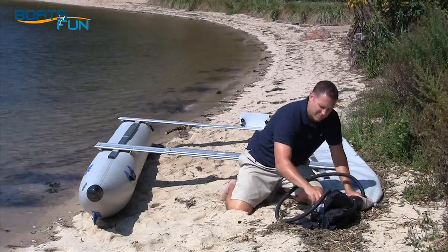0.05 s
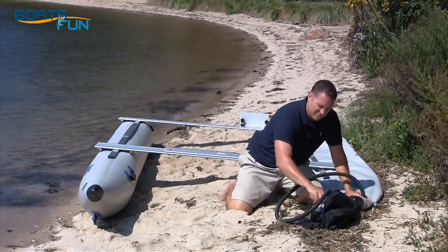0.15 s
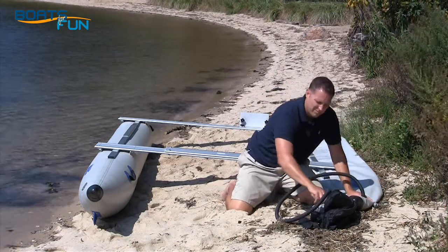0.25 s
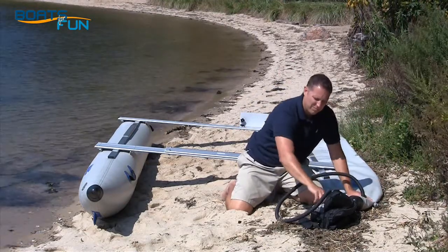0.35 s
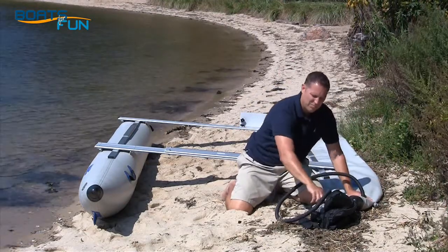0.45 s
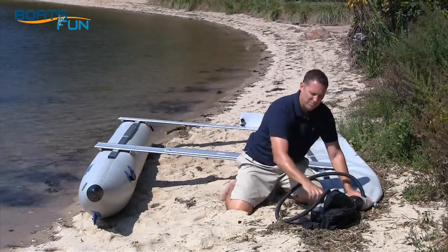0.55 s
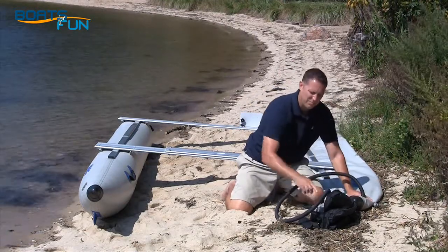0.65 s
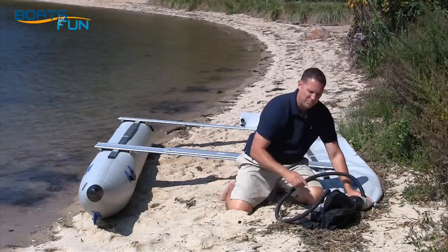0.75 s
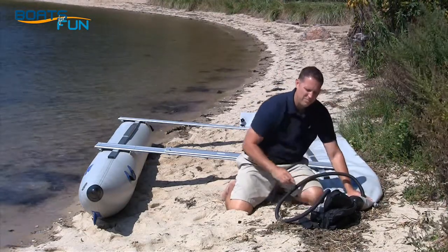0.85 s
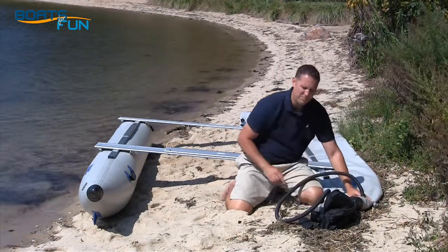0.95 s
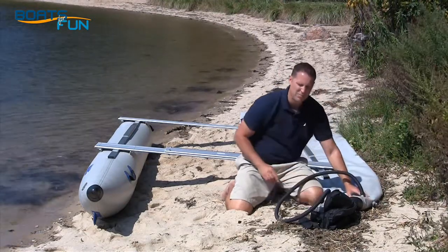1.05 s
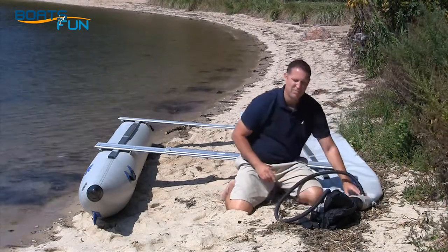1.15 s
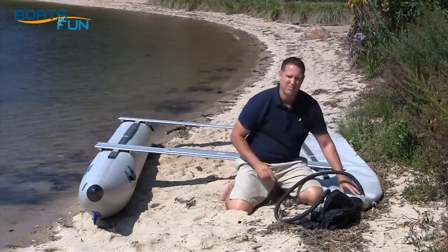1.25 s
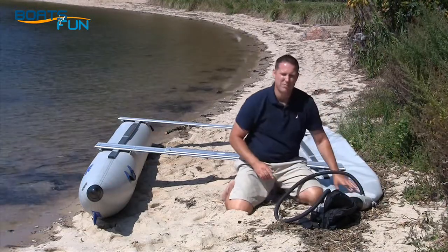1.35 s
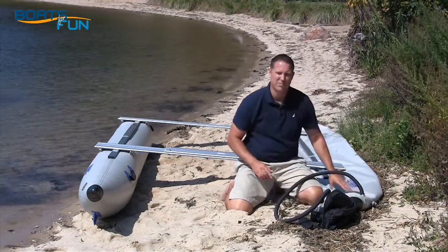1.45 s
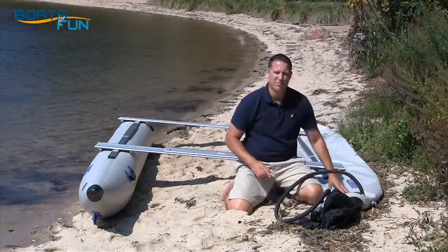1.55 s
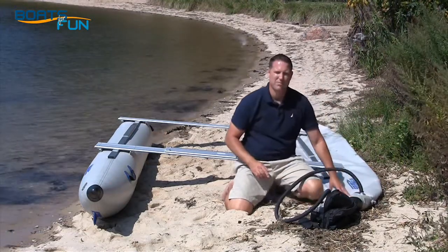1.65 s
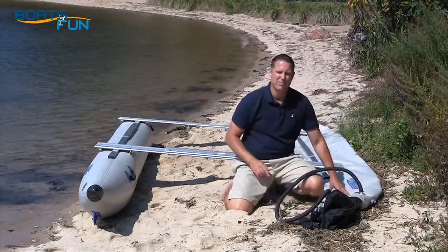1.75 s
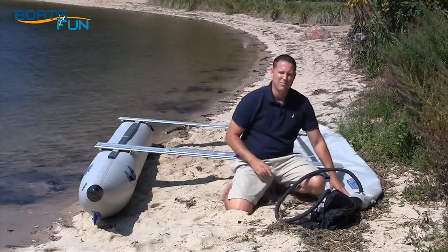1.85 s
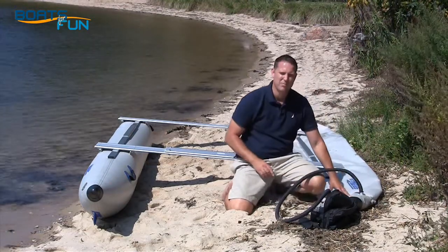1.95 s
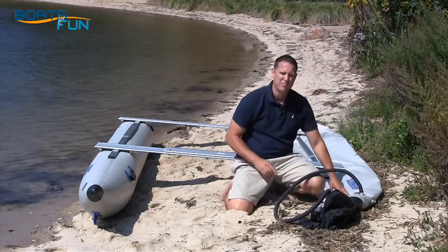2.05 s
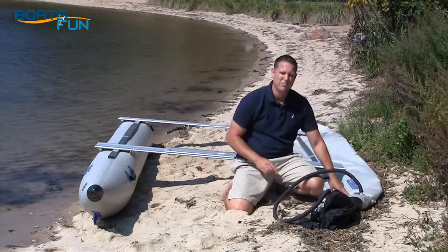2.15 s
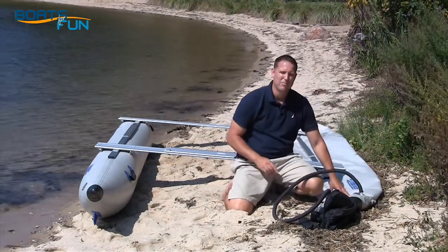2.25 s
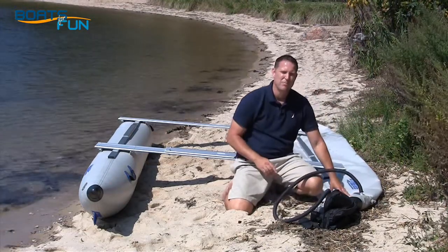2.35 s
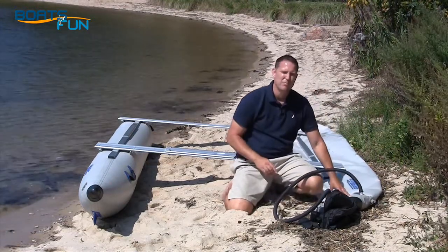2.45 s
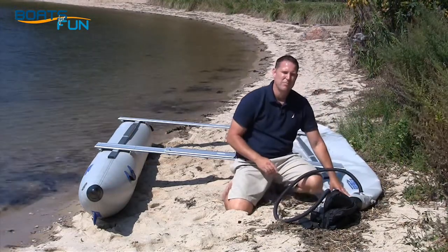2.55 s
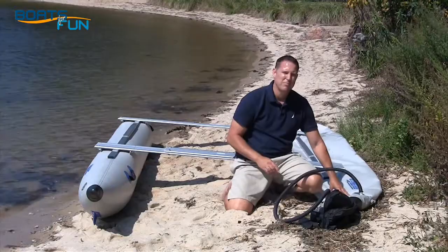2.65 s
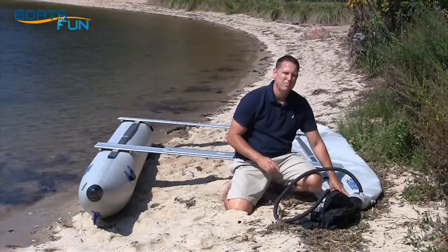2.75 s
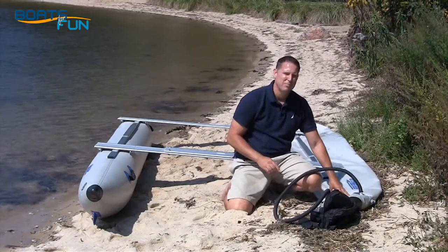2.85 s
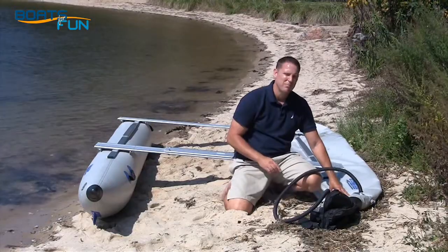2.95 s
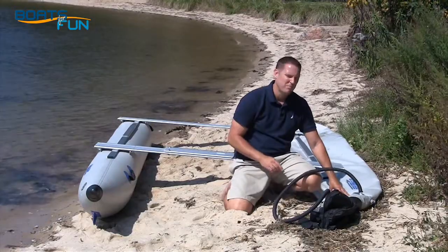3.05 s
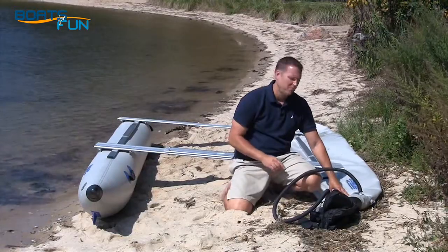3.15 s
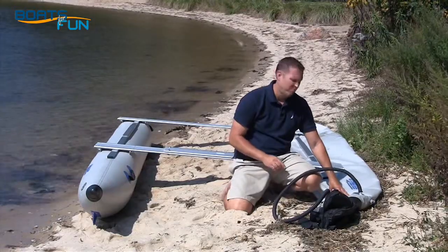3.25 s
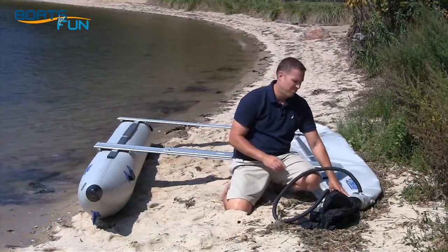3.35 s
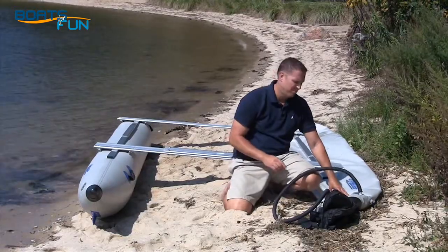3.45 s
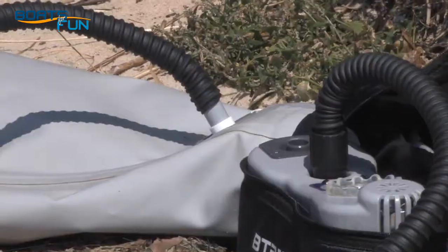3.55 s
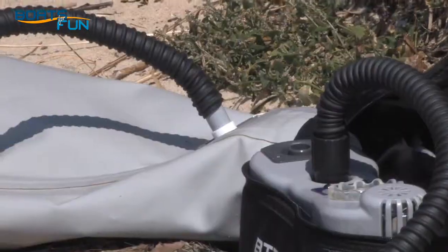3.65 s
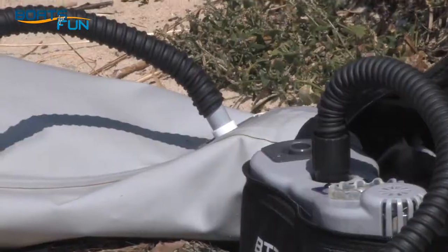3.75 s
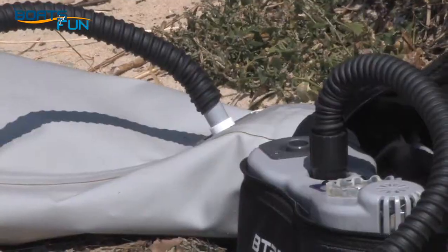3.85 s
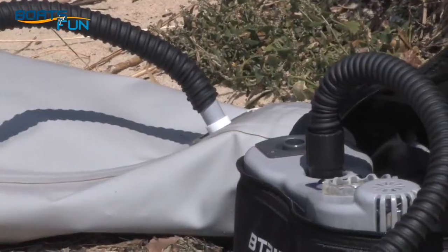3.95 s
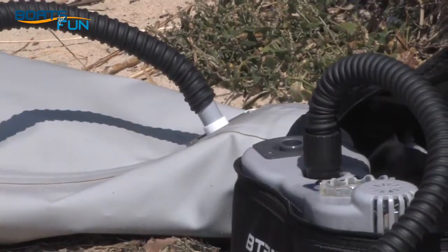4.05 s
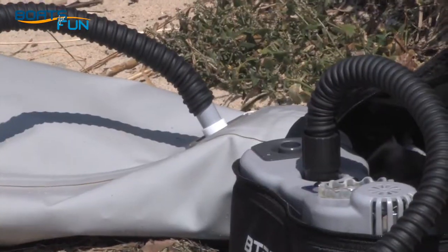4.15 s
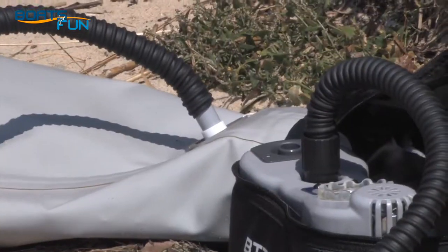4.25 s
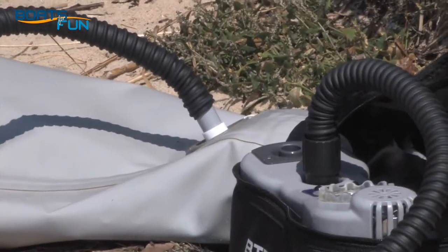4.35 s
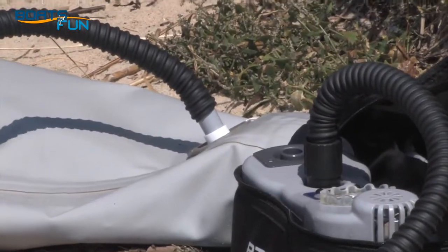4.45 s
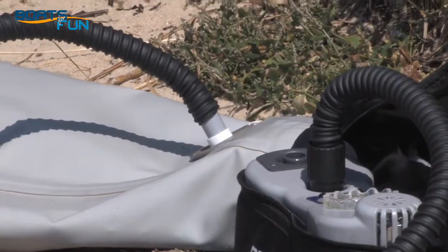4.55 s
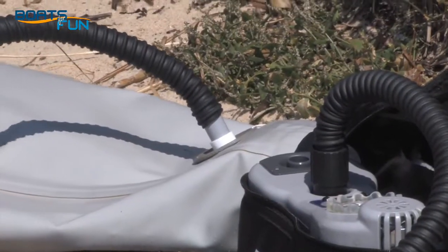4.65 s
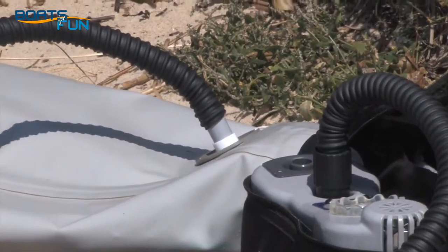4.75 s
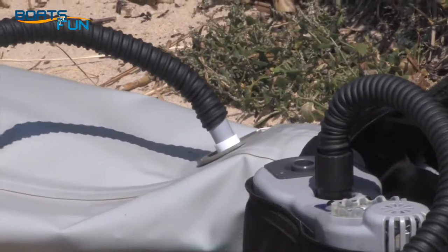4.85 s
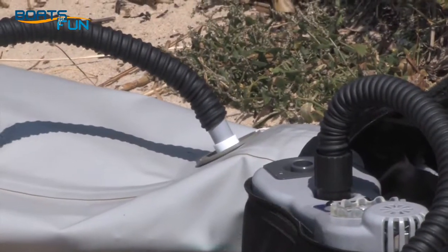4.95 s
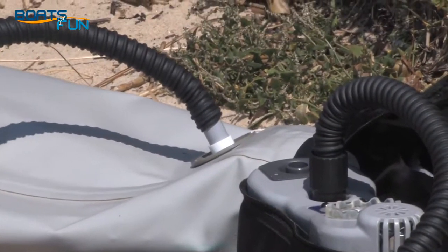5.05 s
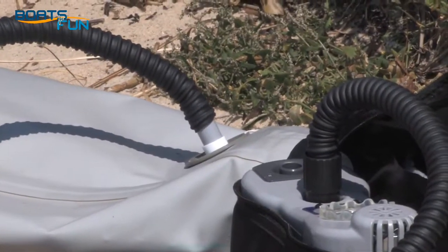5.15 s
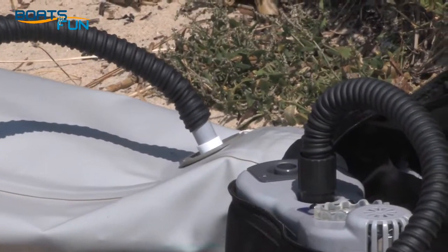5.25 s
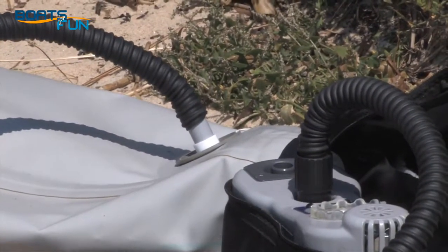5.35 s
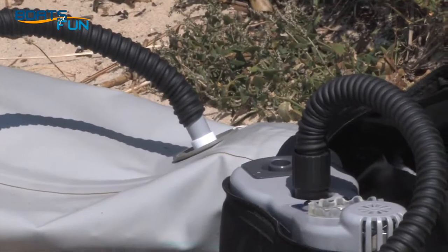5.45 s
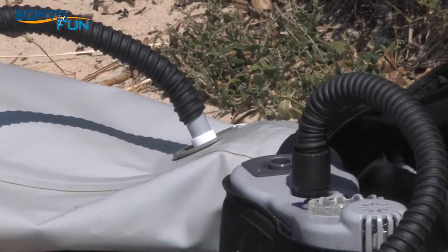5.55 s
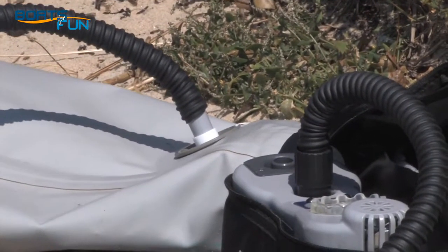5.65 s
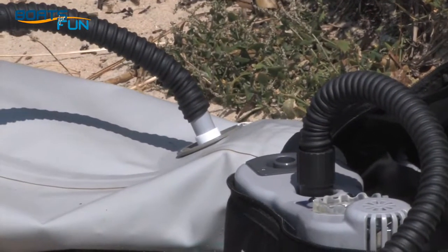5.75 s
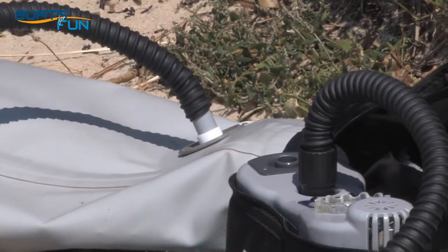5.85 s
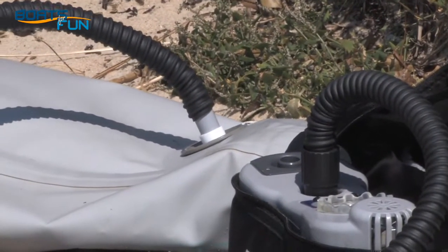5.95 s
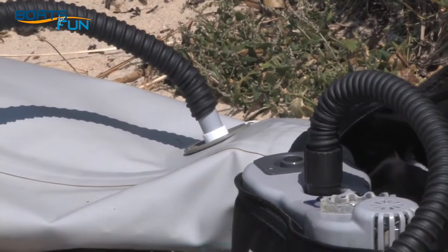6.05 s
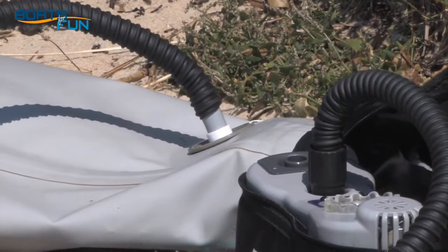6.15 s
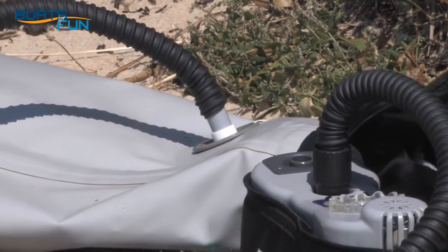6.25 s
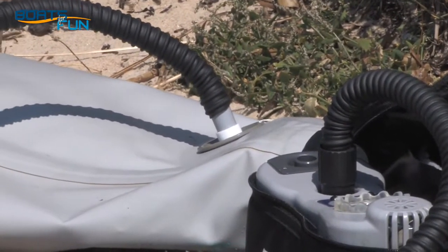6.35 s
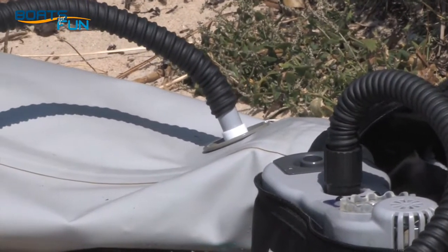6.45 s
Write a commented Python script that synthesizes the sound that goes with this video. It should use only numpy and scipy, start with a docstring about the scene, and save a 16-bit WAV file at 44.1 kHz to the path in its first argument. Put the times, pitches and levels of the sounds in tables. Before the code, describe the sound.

The first 0.4 seconds are quiet: a low, soft wash of shoreline water, faint low hums and a very distant engine, with small dull plastic taps at about 0.15 to 0.19 seconds. At about 0.42 a switch clicks brightly, followed by a tiny rattle, and a small electric blower starts close to the microphone. Its whine sweeps up steeply, with a brief buzzing flare from the casing near 0.6, and is close to full speed by 1.2 to 1.5 as the air noise thickens and brightens. From there it runs steadily to the end at 6.5 seconds: a loud, dominant singing hum around 455 Hz with thinner overtones, wavering very slightly, over hollow hose roar, a hissing jet at the valve and fine high intake hiss. The air swells gently near 2.3, 4.2 and 5.5; the timbre shifts subtly around 3.5. Open air, no echo, no shutdown.

```python
"""A small electric blower, loud in front of the microphone on a beach, spins up and fills a boat tube by hose.
Its unbalanced rotor sings at shaft speed while higher shaft orders sweep through a housing resonance.
Shaped noise makes the air: a roar in the ribbed hose, a jet at the valve and a fine intake hiss.
Clicks of hand, switch and first turns are struck plastic modes with a bright crack.
Behind lie the shore's wash (noise), a far engine (a gliding sine) and two faint hums (narrow noise)."""
import sys
import numpy as np
from scipy import signal
from scipy.fft import rfft, irfft, next_fast_len
from scipy.io import wavfile
from scipy.ndimage import uniform_filter1d

SR = 44100
rng = np.random.default_rng(int(sys.argv[2]) if len(sys.argv) > 2 else 0)


def to_wav(s):
    """Save 16-bit WAV."""
    ch = np.atleast_2d(s).T  # columns
    pcm = np.round(np.clip(ch, -1, 1) * 32767)  # PCM
    wavfile.write(sys.argv[1], SR, pcm.astype(np.int16))


N = 286958  # samples
TIME_S = np.arange(N) / SR
FFT_SIZE, HOP = 1024, 256  # samples
HZ, FRAME_S = np.fft.rfftfreq(FFT_SIZE, 1 / SR), np.arange(N // HOP + 5) * HOP / SR


def amp(db):
    """Decibels to gain."""
    return 10 ** (np.asarray(db) / 20)


def evened(x):
    """Scales to rms 1."""
    return x / np.sqrt(np.mean(x ** 2) + 1e-20)


def curves(rows):
    """Columns of a time table, one value a sample."""
    s, *columns = np.transpose(rows)
    return [np.interp(TIME_S, s, column) for column in columns]


def read(points, hz):
    """Columns of a spectrum table, read on a log frequency axis."""
    f, *columns = np.transpose(points)
    return [np.interp(np.log(hz + 1), np.log(f + 1), column)[:, None] for column in columns]


def bumps(modes, hz):
    """Resonances as added dB over frequency."""
    return sum(db / (1 + (2 * (hz - f) / width) ** 2) for f, width, db in modes)[:, None]


def resonate(x, hz, width):
    """Shifts hz down to zero, smooths and shifts back: a resonance of gain 1."""
    turn = np.exp(2j * np.pi * hz * np.arange(len(x)) / SR)
    r = np.exp(-np.pi * width / SR)
    return 2 * (turn * signal.lfilter([1 - r], [1, -r], x / turn)).real


def drift(rate_hz):
    """Slow random wander of rms 1, weakening above about rate_hz."""
    spectrum = rfft(rng.standard_normal(N))
    rolloff = 1 + (np.fft.rfftfreq(N, 1 / SR) / rate_hz) ** 2
    return evened(irfft(spectrum / rolloff, N))


def noise(shape_db, patchy_db):
    """Random short-time spectra under a shape, with drifting patches; rms 1."""
    real, imag, patches = rng.standard_normal((len(FRAME_S), len(HZ), 3)).T
    patches = uniform_filter1d(patches, size=10, axis=0)  # over frequency
    patches = evened(uniform_filter1d(patches, size=16, axis=1))  # over time
    spectra = (real + 1j * imag) * amp(shape_db + patchy_db * patches)
    return evened(signal.istft(spectra, nperseg=FFT_SIZE, noverlap=FFT_SIZE - HOP)[1][:N])


def step(s, spread_s):
    """Rises smoothly from 0 to 1 around the moment s."""
    return .5 + .5 * np.tanh((TIME_S - s) / (2 * spread_s))


def bell(s, spread_s):
    """A smooth hump of height 1 around the moment s."""
    return np.exp(-.5 * ((TIME_S - s) / spread_s) ** 2)


def switched_on(s):
    """Silence until the moment s, then a 10 ms rise."""
    return np.clip((TIME_S - s) / 0.01, 0, 1)


# Wash of the shore behind the blower. Each row: frequency in Hz, relative level in dB per Hz.
SHORE_SPECTRUM = [(25, -17), (45, 0.5), (100, 3), (150, -2), (250, -4), (350, -14), (800, -14), (1200, -22),
                  (2200, -33), (3000, -36.5), (8000, -40), (11500, -45.5), (12500, -68), (13500, -81)]
SHORE_DB = -44.5  # rms


def shore_wash():
    """Low wash of the shore: noise falling off towards the treble."""
    return amp(SHORE_DB) * noise(read(SHORE_SPECTRUM, HZ)[0], patchy_db=1.0)


# Engine far off. Each row: time in seconds, firing rate in Hz, level in dB.
FAR_ENGINE = [(0, 47.3, -45), (1.1, 50.1, -45), (2.2, 49, -42), (2.6, 52.64, -52), (3.2, 59, -49),
              (4, 62.6, -46), (4.8, 69.4, -47), (5.4, 71.53, -41), (6, 72.77, -45.5), (6.51, 74.7, -46)]


def far_engine():
    """One sine at the firing rate of an engine that speeds up, wavering in pitch and level."""
    firing_hz, level_db = curves(FAR_ENGINE)
    angle = 2 * np.pi * np.cumsum(firing_hz + 0.81 * drift(3.14)) / SR
    return np.sqrt(2) * amp(level_db + 2.1 * drift(2.8)) * np.cos(angle)


# Wavering low hums in the background. Each row: frequency in Hz, width of each filter pass in Hz, level in dB.
LOW_HUMS = [(73.4, 10, -49.5), (117.3, 3.7, -55)]


def low_hums():
    """Noise passed twice through a narrow resonance, so each hum wavers."""
    out = np.zeros(N)
    for hz, width, db in LOW_HUMS:
        narrow = resonate(rng.standard_normal(N), hz, width)
        out += amp(db) * evened(resonate(narrow, hz, width))
    return out


# Hand on the case, the switch and the rattle of the first turns.
# Each row: start in seconds, level in dB, pitch struck near in Hz, bright crack in dB relative to the ring.
TOUCHES = [(0.14, -33, 1950, -38), (.177, -37, 1900, -30), (.183, -30, 600, -25), (.187, -37, 1600, -21),
           (.420, -34.5, 2200, 2.5), (0.427, -27.5, 750, -16), (0.436, -40, 600, -11),
           (0.444, -34, 845, -25), (.451, -25, 620, -30), (.456, -31, 596, -30), (.460, -32, 950, -27),
           (.469, -29, 910, -26.5)]
# Modes of the plastic. Each row: frequency in Hz, width in Hz.
PLASTIC_MODES = [(580, 100), (780, 77), (950, 200), (1650, 240), (2150, 270)]
REACH_DB_PER_OCT = -20  # modes far from the struck pitch ring less


def clicks():
    """Each touch rings the plastic's damped modes briefly and starts with a bright crack."""
    out, t = np.zeros(N), np.arange(1200) / SR
    for s, db, struck_hz, crack_db in TOUCHES:
        ring = np.zeros(len(t))
        for hz, width in PLASTIC_MODES:
            reach = amp(REACH_DB_PER_OCT * abs(np.log2(hz / struck_hz)))
            ring += reach * np.sin(2 * np.pi * hz * t) * np.exp(-np.pi * width * t)
        ring *= 1 - np.exp(-t / 0.00038)  # soft onset
        grit = evened(resonate(rng.standard_normal(len(t)), 6000, 5000))
        crack = grit * (t / 0.0018) ** 2 * np.exp(2 - 2 * t / .002) / 2
        at = round(s * SR)
        out[at:at + len(t)] += amp(db) * (ring + amp(crack_db) * crack)
    return out


ON_S = .43  # the motor starts
# The speed the shaft heads for; early rows shape the spin-up glide, later ones waver slowly with the load.
# Each row: time in seconds, shaft speed in Hz.
SPEED_GOAL = [(.43, 448.6), (.46, 461.4), (.5, 451.9), (.535, 452.5), (.57, 459), (.61, 461), (.67, 457),
              (.85, 455.3), (1.2, 454.2), (1.42, 460), (1.72, 455), (2.0, 456.3), (2.3, 457), (2.73, 452.8),
              (3.1, 456.4), (3.38, 456.3), (3.77, 455.7), (4.05, 459.3), (4.45, 457), (4.72, 454.5),
              (5.15, 457.6), (5.4, 456.4), (5.74, 452), (6.1, 456), (6.5, 453)]
# Lag behind that speed, as two dying terms. Each row: lag at the start in Hz, time constant in seconds.
SPIN_UP_LAG = [(333.1, .1581), (67.8, .631)]


def speed():
    """Shaft speed in Hz: the goal less a lag that dies away exponentially."""
    running_s = np.maximum(TIME_S - ON_S, 0)
    lag = sum(hz * np.exp(-running_s / s) for hz, s in SPIN_UP_LAG)
    return curves(SPEED_GOAL)[0] - lag


def speed_octaves(hz):
    """Octaves of speed relative to the last goal."""
    return np.log2(hz / SPEED_GOAL[-1][1])


PRESSURE_S, PRESSURE_SPREAD_S = 1.244, 0.14  # pressure builds
FIRM_S, FIRM_SPREAD_S = 4.65, .08  # the tube firms
# The colour changes over two spans: reaching full speed, and a later slide (from s, to s).
FULL_S, SLIDE_S = (1.1, 1.6), (3.4, 3.7)
# Air layers. Each row: full level in dB, growth in dB per octave of speed, gain in dB as pressure builds,
# change in dB once the tube firms, rms gust in dB (the sign is immaterial).
LOW_ROAR, UPPER_ROAR = (-28, 9, 0.5, 0.26, 1), (-27, 4.5, 6.5, 0.3, 0.35)
JET_LEVEL, INTAKE_LEVEL = (-38.5, 8.5, 15, -3, 0), (-45, 7.5, 0, -1, -1.03)
# Swells of the upper roar and the jet. Each row: centre in seconds, spread in seconds, lift in dB.
AIR_SURGES = [(2.3, .2, 1), (4.2, .22, 1.5), (5.45, 0.074, 1)]


def air_level(layer):
    """Level of one layer in dB: turbulence grows with speed and shifts with pressure."""
    full_db, growth_db, build_db, firm_db, gust_db = layer
    level_db = full_db + growth_db * speed_octaves(speed())
    level_db += build_db * (step(PRESSURE_S, PRESSURE_SPREAD_S) - 1)
    return level_db + firm_db * step(FIRM_S, FIRM_SPREAD_S) + gust_db * drift(2.1)


def surge_lift():
    """Brief swells in dB."""
    return sum(db * bell(s, spread) for s, spread, db in AIR_SURGES)


# Fine hiss at the intake. Each row: frequency in Hz, then relative level in dB per Hz while spinning up,
# at full speed, and after the slide.
INTAKE_SPECTRUM = [(3480, -4.5, -3, -19.5), (5030, 5, 1.5, -0.5), (5960, 6, 4.5, 1.5), (6350, 5, -1, 4.5),
                   (7130, 5.5, 8.5, 9.5), (7650, 4.5, 6, 3.5), (8100, 3.5, 6, 5.5), (9257, -1.5, 1.5, 3.5),
                   (10300, 0.5, 0, -4.5), (11870, -0.5, 5.5, 1.5), (12100, -11, 9, 6),
                   (12260, -43, -8.5, 5), (13000, -58, -52, -48)]


def intake_hiss():
    """Turbulence at the intake: noise whose spectrum passes through three states."""
    rising, before, after = read(INTAKE_SPECTRUM, HZ)
    full, slide = (np.interp(FRAME_S, span, [0, 1]) for span in (FULL_S, SLIDE_S))
    shape_db = rising + full * (before - rising) + slide * (after - before)
    return amp(air_level(INTAKE_LEVEL)) * noise(shape_db, patchy_db=2.04)


# Jet at the valve. Each row: frequency in Hz, relative level in dB.
JET_SPECTRUM = [(2000, -16), (2900, -4.5), (3300, -6.5), (3680, -4.5), (4000, -6), (4600, -9.5),
                (5400, -13.5), (6500, -47)]
# Resonances of the valve. Each row: frequency in Hz, width in Hz, lift in dB.
JET_MODES = [(3320, 220, 5), (3593, 90, 8), (3820, 46, 3), (4800, 240, 2)]


def valve_jet():
    """Air forced through the valve: noise lifted at the valve's resonances."""
    shape_db = read(JET_SPECTRUM, HZ)[0] + bumps(JET_MODES, HZ)
    return amp(air_level(JET_LEVEL) + surge_lift()) * noise(shape_db, patchy_db=1.2)


# Roar in the hose. Each row: frequency in Hz, relative level in dB.
ROAR_SPECTRUM = [(150, -15.5), (300, -9), (450, -3.5), (900, -1.5), (1300, -5), (2300, -4), (2700, -10.5),
                 (3200, -22), (4500, -43)]
# Standing waves of the ribbed hose. Each row: frequency in Hz, width in Hz, lift in dB.
HOSE_MODES = [(478, 110, 6.5), (650, 59, 7.5), (802, 55, 10.5), (1142, 62, 8), (1508, 170, 6),
              (2038, 160, 5.5), (2570, 190, 2.5), (2980, 230, 2.5)]


def hose_roar():
    """Turbulence in the hose's standing waves; the upper part comes up later than the lower."""
    low_db, upper_db = air_level(LOW_ROAR), air_level(UPPER_ROAR) + surge_lift()
    upper = np.clip(np.log2(HZ / 900 + 1e-9), 0, 1)[:, None]  # fades in from 900 to 1800 Hz
    tilt_db = upper * np.interp(FRAME_S, TIME_S, upper_db - low_db)
    shape_db = read(ROAR_SPECTRUM, HZ)[0] + bumps(HOSE_MODES, HZ) + tilt_db
    return amp(low_db) * noise(shape_db, patchy_db=0.8)


def air():
    """All moving air, heard once the motor starts."""
    return (hose_roar() + valve_jet() + intake_hiss()) * switched_on(ON_S)


# Levels that waver while running, ahead of the radiation, speed and case terms.
# Each row: time in seconds, shaft tone in dB, 2nd order in dB, blade whine in dB.
RUNNING_WAVER = [(.56, -10, -53, -72), (.61, -12, -54, -53), (.66, -10.5, -52, -68),
                 (.75, -11.5, -41.5, -53), (.9, -10.5, -48, -56), (1.0, -11, -28, -56),
                 (1.15, -11.5, -34.5, -52), (1.35, -11.5, -34.5, -66), (1.58, -12.5, -36, -56),
                 (1.95, -12, -41, -50), (2.25, -12, -38.5, -53), (2.47, -12.5, -33.5, -54),
                 (2.8, -13.5, -36, -63), (3.05, -10.7, -45.5, -56), (3.45, -11, -41, -47.5),
                 (3.78, -11.3, -41.5, -58), (4.05, -12, -35, -58), (4.28, -11.6, -42, -56),
                 (4.45, -10.5, -34.5, -53), (4.7, -11, -46, -56), (5.0, -10.5, -41.5, -52.5),
                 (5.4, -11, -42, -48), (5.75, -11.5, -43, -55), (6.1, -11, -40, -51),
                 (6.5, -11.5, -35.5, -50)]
SECOND_WAVER_DB, TONE_FLUTTER_DB = 2.5, 0.51  # rms
SPEED_JITTER_HZ = .12  # rms
# The small case radiates the shaft tone poorly at low speed. Each row: frequency in Hz, gain in dB.
TONE_RADIATION = [(160, -44), (195, -30), (270, -34), (295, -25), (335, -15), (385, -6.5), (405, -4),
                  (420, -2.5), (428, 0)]


def shaft_tone(hz, angle, tone_db):
    """The unbalanced rotor shakes the case once a turn: a sine at shaft speed."""
    radiation_db = read(TONE_RADIATION, hz)[0][:, 0]
    return amp(tone_db + radiation_db + TONE_FLUTTER_DB * drift(19)) * np.cos(angle)


# The case lifts or dims any order that passes. Each row: frequency in Hz, width in Hz, change in dB.
CASE_COLOUR = [(708, 130, 7.5), (746, 30, -8), (820, 30, -11), (945.5, 67, 4), (1008, 73, -20),
               (1150, 79, 0.5), (1242, 57, -6.5), (1361, 74, -3), (1520, 200, 11), (1660, 88, 3.5),
               (3420, 160, 11.5), (5350, 120, 10.5), (6400, 440, -7), (7280, 290, 17)]
# Each row: shaft order, level in dB before and after the slide (at full speed and pressure, ahead of the case),
# growth in dB per octave of speed, gain in dB as pressure builds, shudder in dB, rms random waver in dB.
SHAFT_ORDERS = [(3, -30, -31.5, 4.2, 3.1, 0.54, 0.38), (4, -51.5, -50.5, 4.3, -8, 3, 2.2),
                (5, -45.5, -41, 3.2, 9, 9, 1.8), (6, -46, -51, 5.9, 16.5, 17, 3.3),
                (7, -52, -60, 3.3, 5, 9.6, 3.7), (8, -63.5, -58.5, 8.8, -2, 4, 3.3),
                (9, -62, -54, 3, -2.5, 19, 3.2)]
SECOND_DB_PER_OCT, BLADE_DB_PER_OCT = 16.5, 10
CATCH_S, CATCH_SPREAD_S = 0.496, .008  # the orders set in
SHUDDER_S, SHUDDER_SPREAD_S = 0.583, 0.019  # the upper orders flare once on the way up


def shaft_orders(hz, angle, second_db, blade_db):
    """Sines at multiples of the shaft angle, coloured by the case as they sweep."""
    def coloured(order, db):
        """Gain of an order after the case."""
        return amp(db + bumps(CASE_COLOUR, order * hz)[:, 0])

    octaves, slide = speed_octaves(hz), np.interp(TIME_S, SLIDE_S, [0, 1])
    second_db = second_db + SECOND_DB_PER_OCT * octaves + SECOND_WAVER_DB * drift(8.7)
    # the case colour is read slightly below the exact 2nd order
    orders = coloured(1.957, second_db) * np.cos(2 * angle + 0.51)
    blade_db = blade_db + BLADE_DB_PER_OCT * octaves + 1.5 * drift(10)
    orders += coloured(18, blade_db) * np.cos(18 * angle + .4 * drift(6))
    pressure, shudder = step(PRESSURE_S, PRESSURE_SPREAD_S), bell(SHUDDER_S, SHUDDER_SPREAD_S)
    for order, before_db, after_db, growth_db, build_db, shudder_db, waver_db in SHAFT_ORDERS:
        level_db = before_db + slide * (after_db - before_db) + growth_db * octaves
        level_db += build_db * (pressure - 1) + shudder_db * shudder + waver_db * drift(13)
        orders += coloured(order, level_db) * np.cos(order * angle + 0.5 * drift(2.1))
    return orders * step(CATCH_S, CATCH_SPREAD_S)


# Resonances of the housing. Each row: frequency in Hz, width in Hz, gain in dB.
HOUSING_MODES = [(650, 31, 17.5), (694, 36, 7.5)]
# Overtones of the buzzing housing. Each row: power the ring is raised to, gain in dB.
HOUSING_BUZZ = [(2, 2), (3, -5)]


def housing_ring(orders):
    """The housing resonates with the orders and buzzes in overtones, powers of its own swing."""
    ring = sum(amp(db) * resonate(orders, hz, width) for hz, width, db in HOUSING_MODES)
    swing = signal.hilbert(ring, next_fast_len(N))[:N]
    return ring + sum(amp(db) * (swing ** int(power)).real for power, db in HOUSING_BUZZ)


def rotor():
    """Sines locked to the shaft angle; all but the lowest also ring the housing as they sweep past it."""
    hz = speed()
    tone_db, second_db, blade_db = curves(RUNNING_WAVER)
    angle = 2 * np.pi * np.cumsum(hz + SPEED_JITTER_HZ * drift(25)) / SR
    tone = shaft_tone(hz, angle, tone_db)
    orders = shaft_orders(hz, angle, second_db, blade_db)
    return np.sqrt(2) * (tone + orders + housing_ring(orders)) * switched_on(ON_S)


def scene():
    """All sources, from the far background to the blower, at one microphone."""
    background = shore_wash() + far_engine() + low_hums()
    return (background + clicks() + air() + rotor())[None]


LOW_CUT_HZ, EDGE_HZ = 38, 13770


def record(dry):
    """The microphone's bass cut, then the upper band limit."""
    bass_cut = signal.butter(4, LOW_CUT_HZ, "high", fs=SR, output="sos")
    band_limit = signal.firwin(511, EDGE_HZ, window=("kaiser", 9), fs=SR)
    return signal.oaconvolve(signal.sosfilt(bass_cut, dry), band_limit[None], "same")


dry = scene()
out = record(dry)
to_wav(out)
```